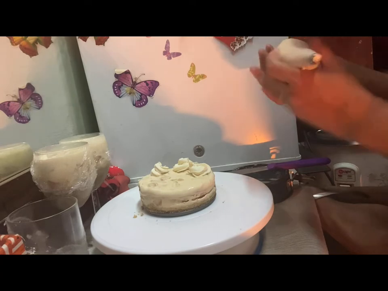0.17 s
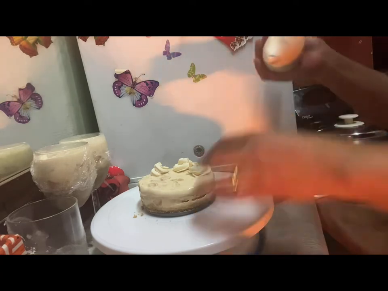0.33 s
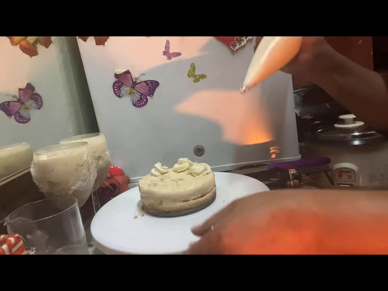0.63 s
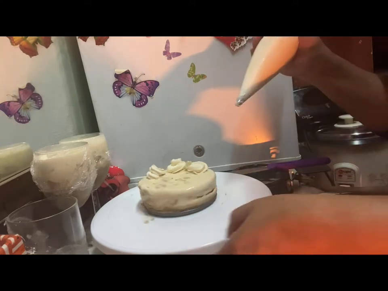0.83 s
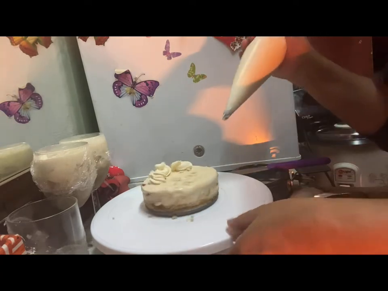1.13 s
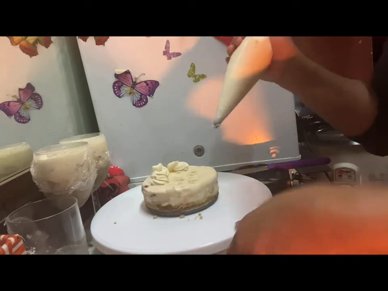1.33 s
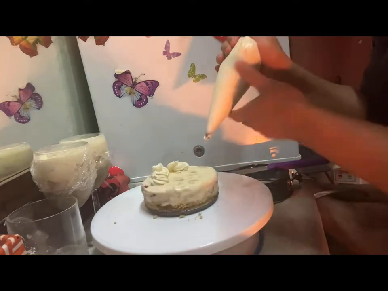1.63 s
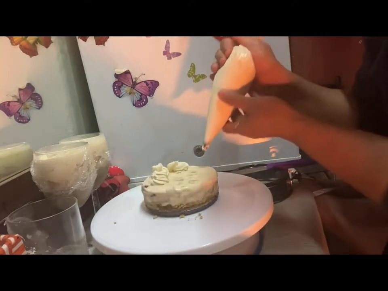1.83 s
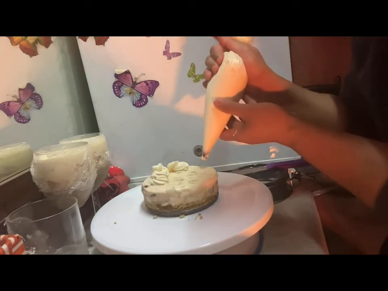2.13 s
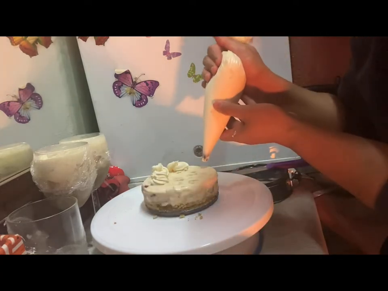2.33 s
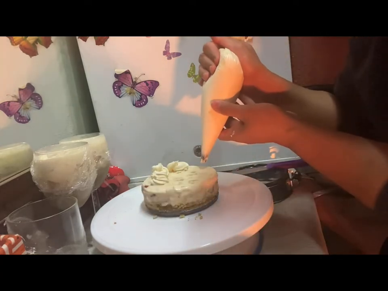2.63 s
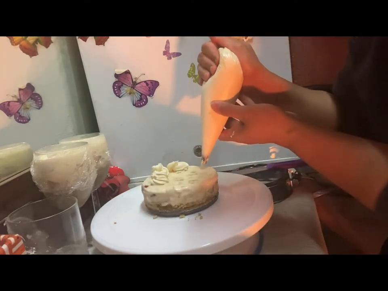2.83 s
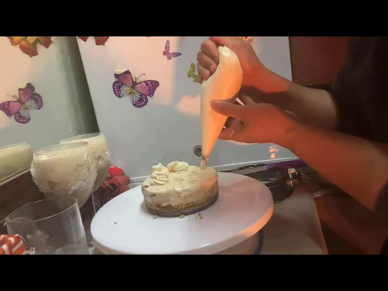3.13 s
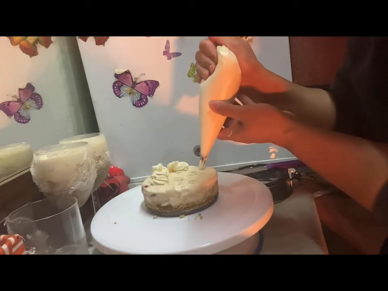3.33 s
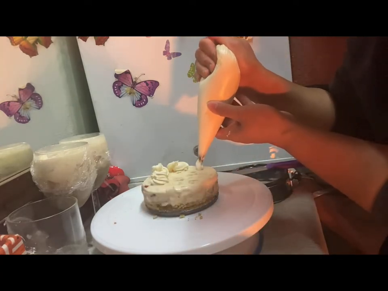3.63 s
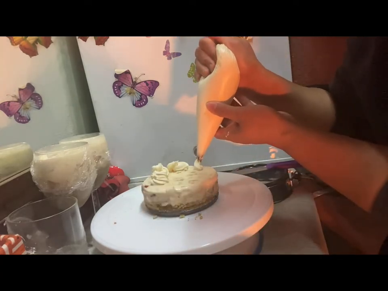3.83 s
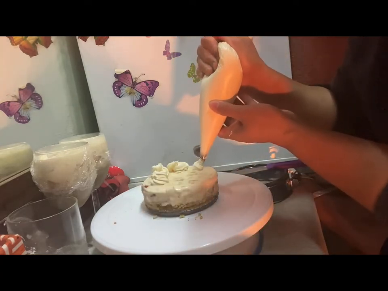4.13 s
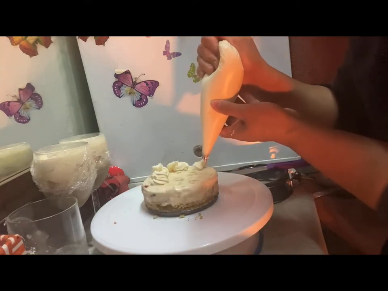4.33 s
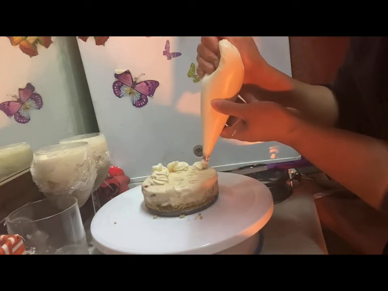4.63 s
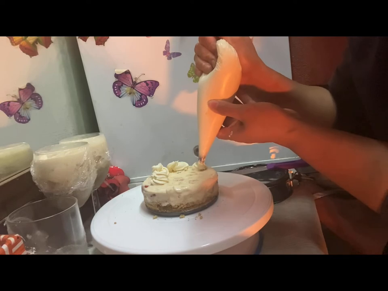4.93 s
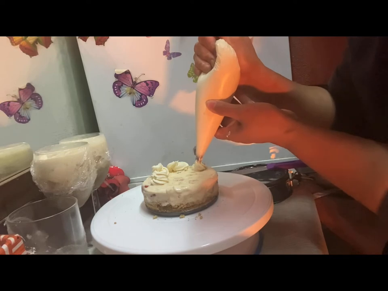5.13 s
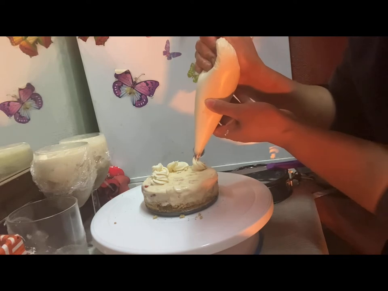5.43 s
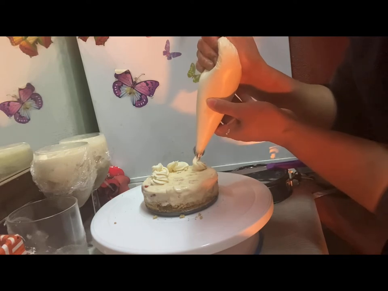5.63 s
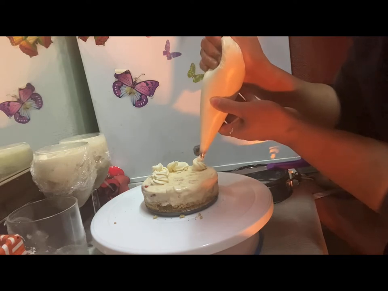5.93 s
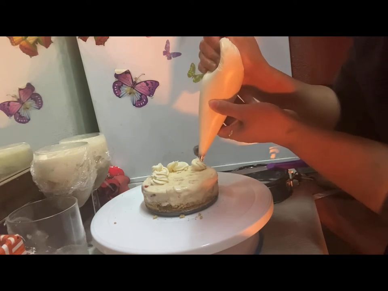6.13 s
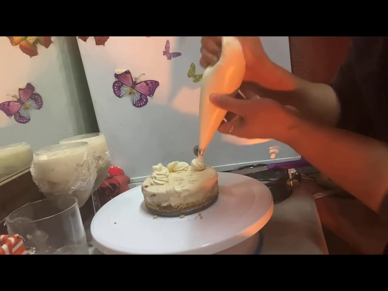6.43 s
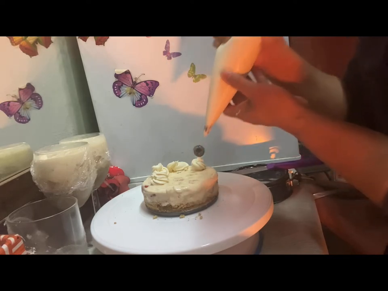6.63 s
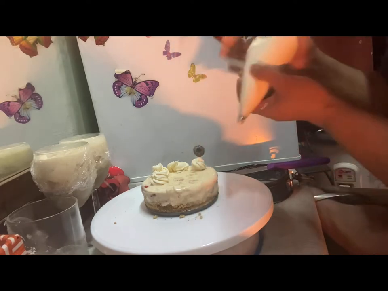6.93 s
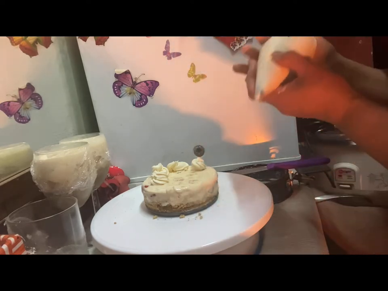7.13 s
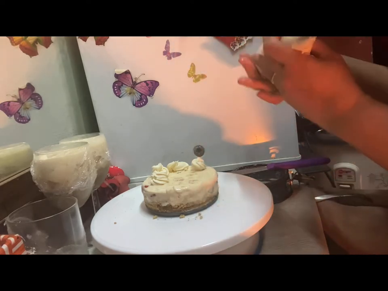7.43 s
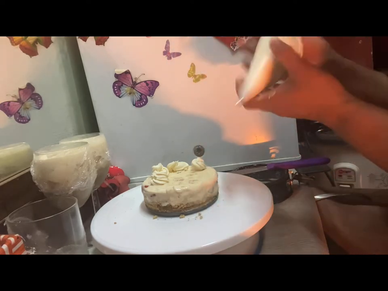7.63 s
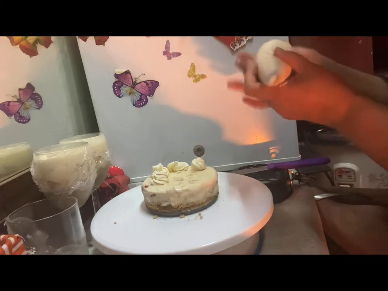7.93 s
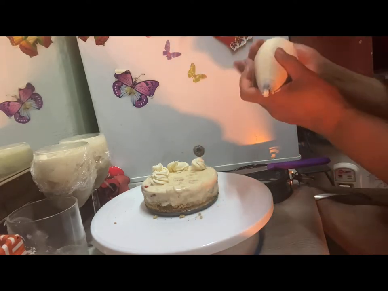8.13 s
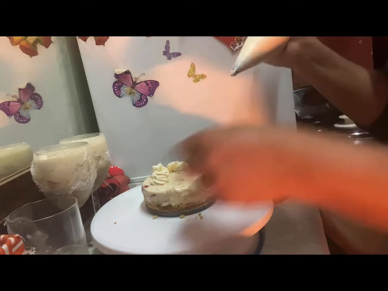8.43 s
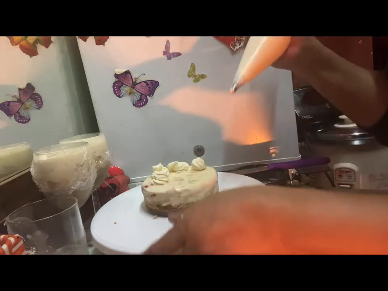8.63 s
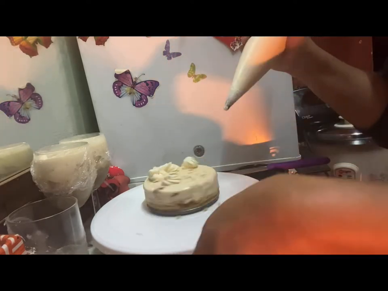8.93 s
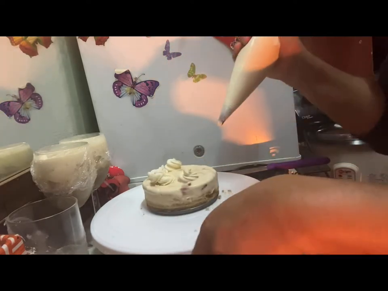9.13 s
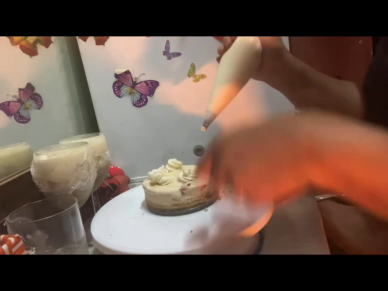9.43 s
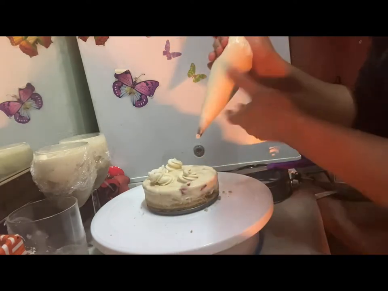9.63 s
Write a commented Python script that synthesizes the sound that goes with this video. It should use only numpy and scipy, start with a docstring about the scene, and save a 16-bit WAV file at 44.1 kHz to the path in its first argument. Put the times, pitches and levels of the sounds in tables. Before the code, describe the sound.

A close stereo pickup in a small, hard kitchen, about ten seconds. Low town rumble runs throughout, with a distant engine drone gliding from about 74 up to 91 hertz and wavering in level; another engine briefly swells near 5.2 s. At the start plastic film rustles softly with faint clicks. From 0.55 to 1.2 s a turntable is pushed and rolls on its bearing, a hollow rumble with loose rattle and a couple of snaps. From 2 to 5.7 s the bag is pressed: sparse, bright, dry snaps, strongest near 2.4, 3.2, 4.1 and 5.6 s, among very faint ticks. From 6.5 to 8.3 s a dense flurry of crisp crinkles and snaps as the bag is twisted. At 8.6 to 9.2 s the turntable spins again, louder, with two hard knocks at 8.84 and 8.99 s. Light dull rustling ends it at 9.4 to 9.7 s.

```python
"""Plastic film snaps and rustles close by as a cream-filled piping bag is squeezed and twisted.
A cake turntable is spun twice on its ball bearing, with two hard knocks in the second spin, and
engines drone far outside over a town's rumble. Film and plate are struck resonators: short force
pulses excite damped modes. Engines are sines gliding in pitch; rumble and soft hisses are filtered
noise. A small hard room adds low resonances and a tail."""
import sys
import numpy as np
from scipy import signal
from scipy.fft import rfft, irfft
from scipy.io import wavfile
from scipy.ndimage import uniform_filter1d

SR = 44100
rng = np.random.default_rng(int(sys.argv[2]) if len(sys.argv) > 2 else 0)


def pcm_store(signal):
    """Save signal as 16-bit PCM."""
    levels = np.round(np.clip(np.atleast_2d(signal), -1, 1) * 32767)
    wavfile.write(sys.argv[1], SR, levels.astype(np.int16).T)


def gain_from_db(level_db):
    """Convert decibel levels to linear amplitude factors (20 dB per decade)."""
    decades = np.asarray(level_db, float) / 20
    return 10 ** decades


N = 431298
TIME = np.arange(N) / SR
HZ = np.maximum(np.fft.rfftfreq(N, 1 / SR), 1)
PORT_LAG = 9  # samples between the two microphone ports for a source off to one side


def snaps():
    """Impulse excitation: a crack amid a fast-dying run of slips rings a damped band, for crease or knock."""
    # sharp snaps: film creases, and two hard turntable knocks at 8.84 and 8.99 s:
    # start_s, level_db, centre_hz
    sharp_snaps = [(0.0887, -55, 4700), (0.3442, -56.5, 4600), (0.377, -62, 4170), (0.797, -43, 2610),
                   (1.063, -46.5, 2800), (1.3139, -65.5, 2700), (1.5337, -56, 3900), (2.0966, -62, 3660),
                   (2.172, -53, 7840), (2.217, -54.5, 8200), (2.3172, -66, 3260), (2.4276, -42.5, 9000),
                   (2.5418, -63.5, 3420), (2.5695, -60.5, 3060), (2.685, -49, 3550), (2.7534, -56.5, 4820),
                   (2.7964, -63, 4430), (2.8404, -65, 4230), (2.994, -58.5, 2830), (3.162, -40.5, 7100),
                   (3.2483, -48.5, 7200), (3.4471, -50.5, 7100), (3.567, -61, 6300), (3.9365, -59.5, 5670),
                   (4.0947, -44.5, 7760), (4.2448, -64.5, 6170), (4.4336, -63, 3240), (4.4646, -55, 7900),
                   (4.6025, -57.5, 8950), (4.8357, -59.5, 2870), (5.3752, -54, 6100), (5.6113, -53, 2940),
                   (5.6383, -37.5, 5000), (5.8681, -66, 2600), (6.315, -62.5, 2920), (6.6049, -46.5, 7800),
                   (6.716, -55, 7600), (6.7865, -53, 7580), (6.8331, -38.5, 8000), (6.9098, -49, 8420),
                   (6.9975, -59, 5760), (7.035, -47, 8200), (7.0594, -36.5, 8340), (7.1134, -49, 4140),
                   (7.1704, -47.5, 4570), (7.242, -48, 8360), (7.2753, -47.5, 4210), (7.3257, -52, 8040),
                   (7.3851, -52, 4530), (7.524, -57.5, 4740), (7.5856, -52.5, 9100), (7.7034, -58.5, 4430),
                   (7.7325, -48.5, 7770), (7.7377, -49, 3720), (7.818, -42, 6150), (7.8389, -42, 3370),
                   (7.9005, -50.5, 6060), (7.956, -61, 3160), (8.0073, -49.5, 7990), (8.0289, -43.5, 8700),
                   (8.0731, -57.5, 4720), (8.103, -53, 7700), (8.135, -56, 7640), (8.1552, -50.5, 6030),
                   (8.6258, -55.5, 2860), (8.8414, -33.5, 2500), (8.994, -33, 3420)]
    # echoes off counter, cake and wall: delay_ms, level_db
    echoes = [(1.6, -16), (2.8, -0.5), (12, -24)]
    octaves = 0.58  # bandwidth of the ring
    rows = [*sharp_snaps, *ticks()]
    t = np.arange(512) / SR
    heard = np.zeros((2, N + 1400))
    spread = np.zeros(N + 1400)  # what leaves in all directions: the cracks without echoes
    slips = rng.standard_normal((len(rows), len(t))) ** 3
    places = rng.random((len(rows), 2, 1 + len(echoes)))
    shape = np.minimum(t / 0.00092, 1) ** 2 * np.exp(-t / 0.0012)
    crack = 7.4 * (np.arange(len(t)) == int(SR / 1250))  # just after the first slips
    edge = 2 ** (octaves / 2)
    for (s, db, hz), slip, (spot, side) in zip(rows, slips, places):
        force = slip * shape + crack
        ring = filtered(force, 1, [hz / edge, hz * edge], "band")
        # a duller body answers under the ring
        body = filtered(force, 2, [1200, 3200], "band")
        ring = filtered(ring + 0.27 * force, 2, 1000, "high")
        gain = gain_from_db(db) * 4.17 / np.sqrt(np.sum(ring ** 2))
        burst = gain * ring
        first = int(s * SR)
        # the crack that feeds the room is set from the energy of the burst
        flip = filtered(crack, 1, [hz / edge / 1.3, hz * edge], "band")
        spread[first:first + len(t)] += 1.5 * flip * np.sqrt(np.sum(burst ** 2) / np.sum(flip ** 2))
        # the body radiates as a whole, so both ports get it together
        heard[:, first:first + len(t)] += 0.3 * gain * body
        # every snap sits elsewhere, so its echo paths and port lag differ a little
        for (ms, path_db), along, across in zip([(0, 0), *echoes], spot, side):
            start = int((s + ms * (0.8 + 0.4 * along) / 1000) * SR)
            lag = int(PORT_LAG * (0.85 + 0.4 * across))
            heard[0, start:start + len(t)] += gain_from_db(path_db) * burst
            heard[1, start + lag:start + lag + len(t)] += gain_from_db(path_db) * burst
    return heard[:, :N], spread[:N]


def ticks():
    """Random point process: faint snaps at random moments and pitches while the bag is pressed."""
    from_s, to_s, per_s = 2.0, 5.7, 6
    typical_db, scatter_db = -70.5, 4.5
    moment, loudness, pitch = rng.random((int(per_s * (to_s - from_s)), 3)).T
    start_s = from_s + (to_s - from_s) * moment
    level_db = typical_db + scatter_db * (2 * loudness - 1)
    return zip(start_s, level_db, 3000 * 3 ** pitch)


def rustle():
    """Stick-slip friction: tiny creases crackle in flurries over the hiss of sliding skin."""
    # hands working the bag, one row a grip or twist:
    # start_s, hold_s, level_db, brightness (-5 dull to 5 bright, no further effect beyond)
    grips = [(-.05, 0.1, -64.5, -1.5), (0.487, 0.048, -75, 2), (1.204, 0.0059, -74, 0),
             (1.336, .16, -73.5, -10.5), (1.549, 0.17, -72.5, -3), (6.5, 0.21, -76.5, 0),
             (6.695, 0.042, -71, 2.5), (6.751, .06, -61.5, -4), (6.876, .12, -64.5, -3.5),
             (7.04, 0.072, -61.5, -1.5), (7.15, 0.15, -61.5, -1), (7.429, 0.066, -68, 0.5),
             (7.568, 0.093, -66.5, 3), (7.734, 0.041, -61.5, 1), (7.795, 0.024, -62.5, -1),
             (7.856, 0.18, -73, -2), (8.097, 0.044, -68, 1.5), (8.175, 0.12, -72, -6.5),
             (9.431, 0.13, -73.5, -2), (9.586, .1, -70, -1.5)]
    # spectrum of the film's rustle: frequency_hz, density_db (per Hz)
    film_colour = [(500, -3.5), (1200, -12), (2000, -4.5), (3400, -1), (5300, -3.5), (8200, 0.5),
                   (12000, -1), (16000, -5.5)]
    rise_s, rise_share, let_go_s = 0.022, 0.25, 0.17  # rise lengthens by a share of the hold; fall by 60 dB
    tilt = np.log2(HZ / 4500).clip(-2, 2)
    flurry = walk(30)
    layers = 0
    # each patch of film has its own pitch and its own lag between the ports
    for hz in 1500 * 1.6 ** np.arange(6):
        crackle = grains(200, spread_db=4.0) * gain_from_db(2.3 * flurry + 2.4 * walk(25))
        pair = np.array([crackle, np.roll(crackle, rng.integers(4, 14))]) / np.std(crackle)
        layers = layers + rfft(pair) / (1 + 1j * 0.46 * (HZ / hz - hz / HZ))
    crackling = irfft(layers, N)
    sliding = gain_from_db(0.58 * flurry) * rng.standard_normal((2, N))
    # a dull and a bright version of each, tilted by 5 dB per octave
    gains = [gain_from_db(on_hz(film_colour) + sign * 5 * tilt) for sign in (-1, 1)]
    creases = [colour(crackling, gain) for gain in gains]
    skin = [colour(sliding, gain) for gain in gains]
    out = 0
    for start, hold, db, brightness in grips:
        gate = envelope(start, rise_s + rise_share * hold, hold, let_go_s)
        share = np.clip(0.5 + brightness / 10, 0, 1)
        # a light touch mostly slides; a firm grip makes the film crackle
        grip = np.clip((db + 77) / 15, 0.03, 0.85)
        dull, bright = (np.sqrt(grip) * a + np.sqrt(1 - grip) * b for a, b in zip(creases, skin))
        out = out + gate * gain_from_db(db) * ((1 - share) * dull + share * bright)
    return out


def turntable():
    """Rolling-contact excitation: balls on a rough race knock the modes of plate and base; the cage rattles."""
    # two spins, each pushed, swung up to speed and braked: time_s, plate_level_db
    spins = [
        [(.53, -78), (.6, -57), (.72, -51), (.82, -45), (.92, -44), (1.09, -47.5), (1.15, -56.5), (1.25, -81)],
        [(8.62, -70), (8.68, -55), (8.77, -51), (8.85, -40.5), (8.97, -41.5), (9.05, -45), (9.11, -60.5),
         (9.2, -78)],
    ]
    # modes of the plate: frequency_hz, width_hz, level_db
    plate_modes = [(272, 39, 4.5), (362.5, 37, 5), (629, 89, 1), (800, 100, -11), (1034, 250, -5.5),
                   (1218, 17, -11.5), (1436, 120, -15.5), (1683, 67, -9), (1913, 190, -7.5),
                   (2240, 190, -13), (3550, 150, -19)]
    # modes of the base: frequency_hz, width_hz, level_db
    base_modes = [(136, 17.5, -2.5), (182.7, 16.5, 3.5)]
    # spectrum of the loose cage: frequency_hz, density_db (per Hz)
    cage_colour = [(1200, -5.5), (2500, -2), (4800, -12.5), (8500, -15.5), (12000, -28), (16000, -26.5)]
    # the hand meeting the plate: start_s, level_db
    touches = [(0.587, -48), (8.625, -56), (8.661, -56), (9.236, -59)]
    # phase by which the plate's modes trail at the left port: frequency_hz, phase_rad
    trail = [(170, 0), (260, 0.55), (2000, 0.95), (2600, 2.02)]
    reference_db = -43  # plate level at which speed counts as 1
    cage_db, base_db = -11.5, -0.5  # against the plate at speed 1
    cage_power, base_power = 1.08, 0.99  # how steeply they grow with speed
    bumps_db, touch_t60_s = 2.0, 0.15  # unevenness of the race; decay of a touch
    # rolling contact is a soft push: little reaches the highest or the lowest notes
    push = 1 / (1 + (HZ / 3000) ** 4) / (1 + (100 / HZ) ** 4)
    bumps = walk(45)
    knocks = [grains(2500, spread_db=1.5) * gain_from_db(bumps_db * bumps) for _ in range(2)]
    plate = np.array([colour(k, resonances(plate_modes) * push) for k in knocks])
    base = np.array([colour(k, resonances(base_modes) * push) for k in knocks])
    cage = []
    for _ in range(2):
        rattle = grains(3000, spread_db=5.0) * gain_from_db(0.53 * bumps + 2.8 * walk(80))
        cage.append(colour(rattle, gain_from_db(on_hz(cage_colour))))
    cage = np.array(cage)
    pair = 0
    for rows in spins:
        gate, db = on_time(rows)
        speed = gate * gain_from_db(db - reference_db)
        moving = speed * plate
        moving = moving + gain_from_db(cage_db) * speed ** cage_power * cage
        moving = moving + gain_from_db(base_db) * speed ** base_power * base
        pair = pair + gain_from_db(reference_db) * moving
    # a soft hand stirs mainly the plate's lowest modes
    thud = colour(knocks[0], resonances(plate_modes) / (1 + (HZ / 700) ** 2) * push)
    for s, db in touches:
        pair = pair + gain_from_db(db) * envelope(s, 0.0013, 0.0044, touch_t60_s) * thud
    # the counter carries the lowest modes to both ports alike, the right one slightly first
    like = on_hz([(200, 1.0), (340, 0.57), (480, 0.37), (620, 0.89), (1900, 0.66), (4000, 0.18)])
    left, right = ports(*pair, like)
    return np.array([irfft(rfft(left) * np.exp(-1j * on_hz(trail)), N), right])


def engines():
    """Transmission loss: only the firing note passes the walls, a gliding sine of randomly wandering level."""
    # a low drone gliding in pitch, its level wandering at random: time_s, pitch_hz, level_db
    drone = [(0, 73.87, -51), (.8, 76, -52.5), (1.6, 81, -47.5), (2.2, 81.3, -50), (2.75, 84.6, -50.5),
             (3.3, 91, -51.5), (3.9, 90.9, -55), (4.4, 90.54, -43), (4.8, 89.96, -67), (5.5, 88, -55.5),
             (6.5, 88, -60), (7.4, 88, -57), (8.2, 88, -50), (8.6, 87.1, -59), (9.05, 86.8, -45.5),
             (9.78, 84.4, -54.5)]
    # two engines that swell and fade: time_s, pitch_hz, level_db
    passers = [
        [(4.95, 84, -71), (5.2, 78.2, -49), (5.5, 73.3, -53), (5.7, 70, -79)],
        [(6.9, 44, -68), (7.3, 52.47, -65), (7.7, 54.7, -57), (8.2, 49.6, -68), (8.6, 43, -66),
         (8.9, 42.8, -88)],
    ]
    out = 0
    for rows in [drone, *passers]:
        gate, hz, db = on_time(rows)
        phase = 2 * np.pi * np.cumsum(hz * (1 + 0.013 * walk(8.1))) / SR
        out = out + gate * gain_from_db(db + 2.4 * walk(10)) * np.sqrt(2) * np.sin(phase)
    left, right = ports(out, 0 * out, like=1)
    return np.array([left, np.roll(right, PORT_LAG)])


def town():
    """Modal amplification: diffuse traffic and air noise is lifted at the room's resonances."""
    # loudness of the rumble: time_s, level_db
    loudness = [(0, -52.5), (2, -52), (4.5, -52), (5.6, -53), (6.5, -54.5), (8, -52.5), (9.78, -51.5)]
    # its spectrum ahead of the room: frequency_hz, density_db (per Hz)
    rumble_colour = [(25, 0), (45, -7), (110, -1.5), (200, -3), (310, -13), (400, -14), (800, -17),
                     (1100, -23.5), (2300, -30.5), (3200, -40.5), (8000, -45.5), (16000, -47)]
    # room resonances it feeds: frequency_hz, width_hz, level_db
    room_modes = [(65.5, 7.4, 22.4), (88, 10, 15.3), (101.6, 21, 14.5), (107.6, 5.6, 16.8),
                  (199.3, 11.6, 8.85), (241, 28, 4.75), (304.8, 38.4, 8.9), (484.6, 33, 4.5),
                  (800, 7.3, 7.4)]
    # likeness of the two ports in diffuse sound: frequency_hz, likeness (0-1)
    likeness = [(60, .97), (170, .95), (290, .7), (450, .2), (1000, .05), (16000, .01)]
    gain = gain_from_db(on_hz(rumble_colour)) * np.hypot(1, resonances(room_modes))
    _, db = on_time(loudness)
    left, right = ports(*rng.standard_normal((2, N)), on_hz(likeness))
    pair = np.array([left, np.roll(right, PORT_LAG)])
    return colour(pair, gain) * gain_from_db(db + 0.5 * walk(3.15))


def hisses():
    """Band-limited noise: faint soft puffs from afar, Gaussian in both time and frequency."""
    # puffs: centre_s, length_s, centre_hz, width_hz, level_db
    puffs = [(2.29, 0.041, 6030, 900, -85), (2.803, 0.11, 4730, 1200, -86),
             (5.212, 0.084, 5500, 800, -83.5), (5.42, 0.11, 4200, 700, -81.5),
             (6.55, 0.088, 5660, 600, -83)]
    out = 0
    noise = rfft(rng.standard_normal((2, N)))
    for s, length, hz, width, db in puffs:
        puff = irfft(noise * np.exp(-((HZ - hz) / width) ** 2 * 2), N)
        swell = np.exp(-((TIME - s) / length) ** 2 * 2)
        out = out + gain_from_db(db) * puff / np.std(puff) * swell
    return out


def room(pair, feed):
    """Reverberation: an exponentially decaying noise tail behind a close source, other for each port."""
    t60_s, tail_db = 0.18, -7
    t = np.arange(int(0.4 * SR)) / SR
    tail = rng.standard_normal((2, len(t))) * gain_from_db(-60 * t / t60_s) * np.minimum(t / 0.0039, 1)
    tail = gain_from_db(tail_db) * tail / np.sqrt(np.sum(tail ** 2, axis=1, keepdims=True))
    return pair + signal.fftconvolve(feed, tail, axes=1)[:, :N]


def ports(first, second, like):
    """Interchannel coherence: two unrelated signals mixed into a pair of given likeness and balance."""
    # balance of the two microphone ports: frequency_hz, left_minus_right_db
    balance = [(30, -5), (60, 1), (200, 5), (380, -1), (700, -4), (1300, -1.5), (2400, -0.8), (5000, -0.5)]
    mid = rfft(first) * np.sqrt((1 + like) / 2)
    side = rfft(second) * np.sqrt((1 - like) / 2)
    tilt = gain_from_db(on_hz(balance) / 2)
    return irfft(np.array([(mid + side) * tilt, (mid - side) / tilt]), N)


def resonances(modes):
    """Incoherent modal sum: damped modes driven at unrelated spots add their powers."""
    power = 0
    for hz, width, db in modes:
        detuning = (HZ / hz - hz / HZ) * hz / width
        power = power + gain_from_db(db) ** 2 / (1 + detuning ** 2) ** 1.5
    return np.sqrt(power)


def grains(per_s, spread_db):
    """Shot noise: impulses of either sign at random moments, mostly small with a few large."""
    chance = rng.random((3, N))
    size = gain_from_db(np.minimum(-spread_db * np.log(1 - chance[1]), 22))
    return (chance[0] < per_s / SR) * size * np.sign(chance[2] - 0.5)


def walk(rate):
    """Smoothed random modulation: levels held 1 / rate s and slewed twice, of spread near 1."""
    k = int(SR / rate)
    steps = np.repeat(rng.standard_normal(N // k + 1), k)
    return 1.235 * uniform_filter1d(uniform_filter1d(steps, k), k)[:N]


def envelope(start, rise, hold, fall):
    """Exponential decay: a smooth rise, a hold, then a fall of 60 dB over the given time."""
    up = np.sin(np.pi / 2 * np.clip((TIME - start) / rise, 0, 1)) ** 2
    return up * gain_from_db(-60 * np.clip((TIME - start - rise - hold) / fall, 0, 3))


def filtered(x, order, hz, kind):
    """Linear filtering by a Butterworth response."""
    return signal.sosfilt(signal.butter(order, hz, kind, fs=SR, output="sos"), x)


def colour(x, gain):
    """Spectral shaping: filtered by a gain per frequency, then set to rms 1."""
    y = irfft(rfft(x) * gain, N)
    return y / np.sqrt(np.mean(y ** 2))


def on_hz(points):
    """Log-frequency interpolation: a (Hz, value) table read at every frequency."""
    hz, value = np.transpose(points)
    return np.interp(np.log(HZ), np.log(hz), value)


def on_time(rows):
    """Linear interpolation in time: a gate that closes softly outside the rows, then each column."""
    s, *columns = np.transpose(rows)
    gate = uniform_filter1d(1.0 * ((TIME >= s[0]) & (TIME <= s[-1])), size=800)
    return gate, *(np.interp(TIME, s, c) for c in columns)


def scene():
    """Superposition: snaps and film close by with the room's tail, the rest around them."""
    heard, spread = snaps()
    film = rustle()
    close = room(heard + film, spread + film)
    return close + turntable() + engines() + town() + hisses()


def low_pass(x):
    """Removes everything above the highest recorded frequency."""
    return signal.sosfilt(signal.butter(12, 15690, fs=SR, output="sos"), x)


def record(dry):
    """Spectral shaping: the treble has a narrow gap near 10.6 kHz and rolls off at the top."""
    response = [(9300, 0.92), (9800, -8), (10600, -25.5), (11100, -6.5), (11600, -2), (14300, 0),
                (15200, -24)]
    mix = irfft(rfft(dry) * gain_from_db(on_hz(response)), N)
    return low_pass(mix)


dry = scene()
out = record(dry)
pcm_store(out)
```